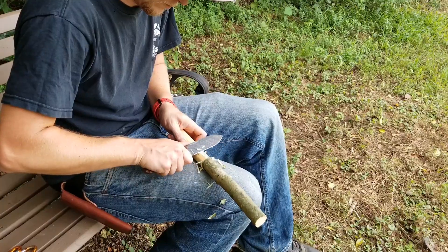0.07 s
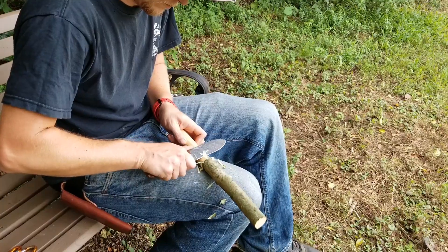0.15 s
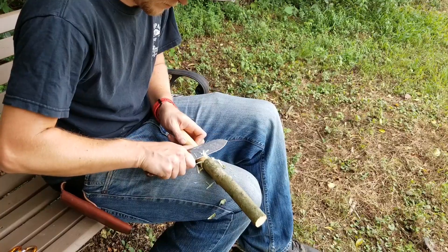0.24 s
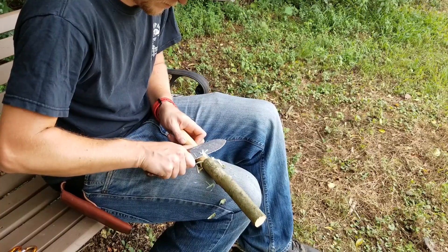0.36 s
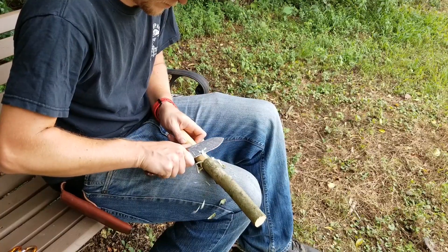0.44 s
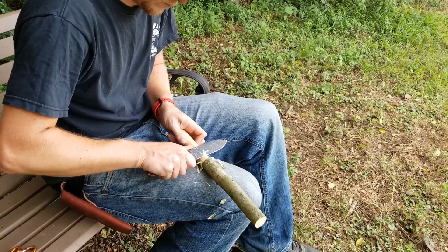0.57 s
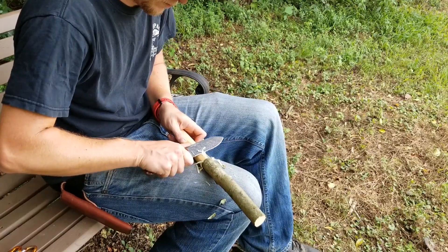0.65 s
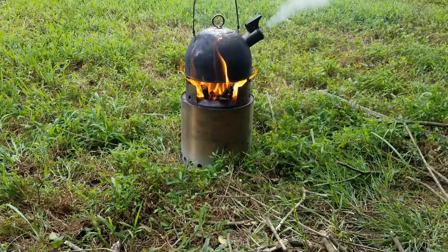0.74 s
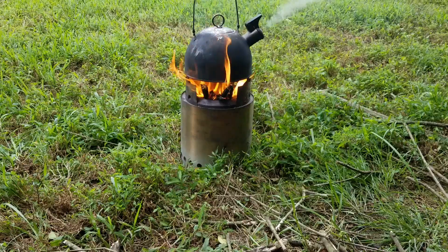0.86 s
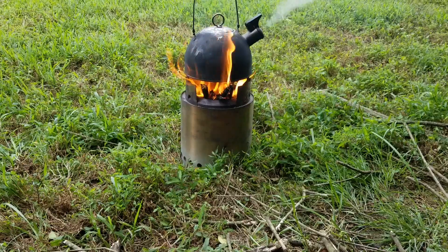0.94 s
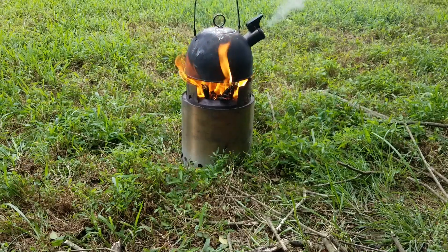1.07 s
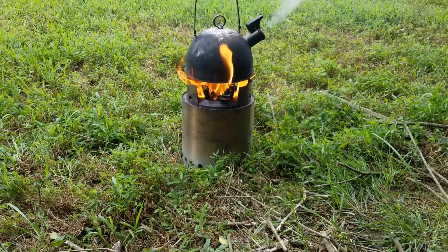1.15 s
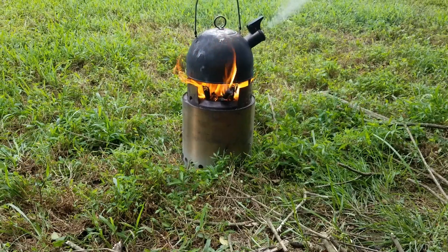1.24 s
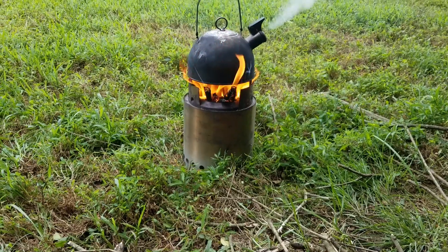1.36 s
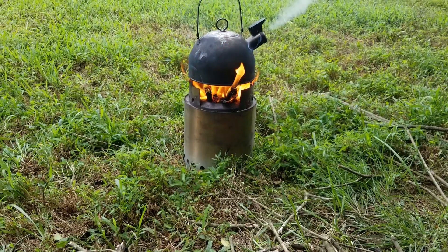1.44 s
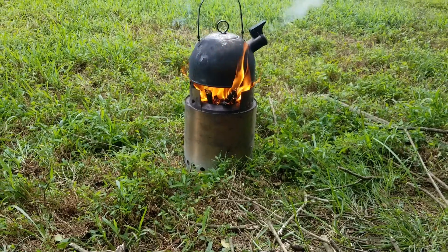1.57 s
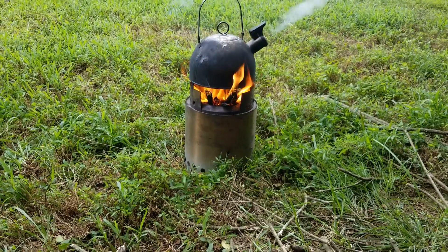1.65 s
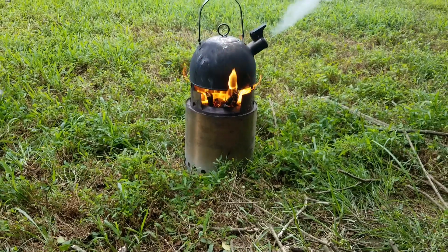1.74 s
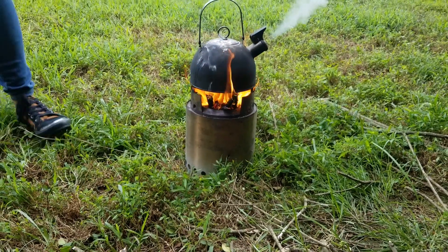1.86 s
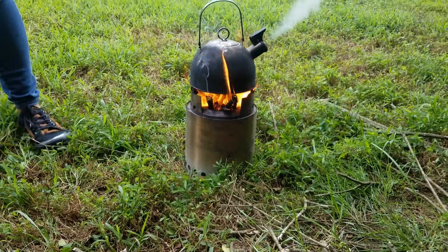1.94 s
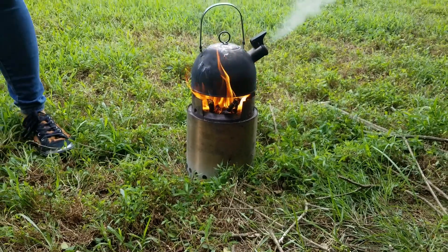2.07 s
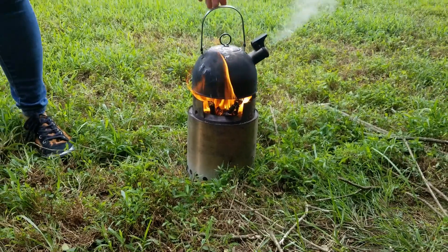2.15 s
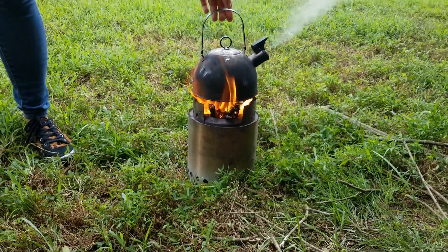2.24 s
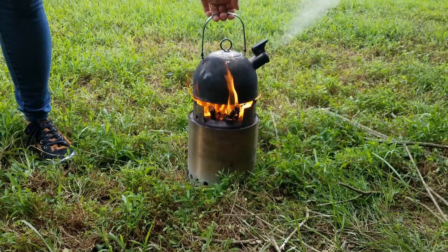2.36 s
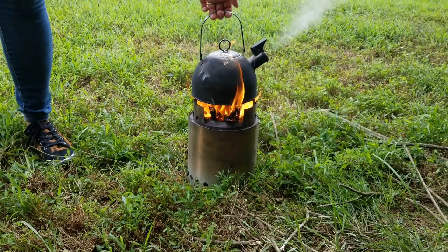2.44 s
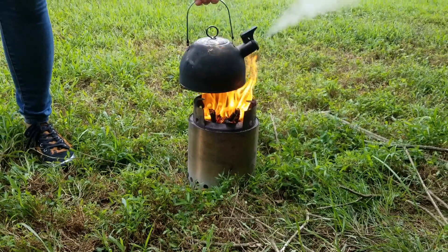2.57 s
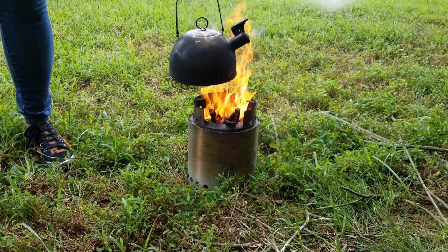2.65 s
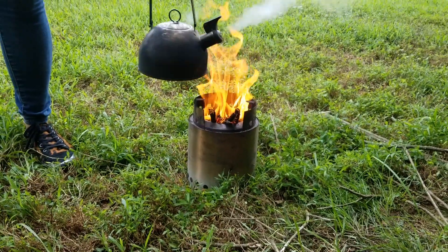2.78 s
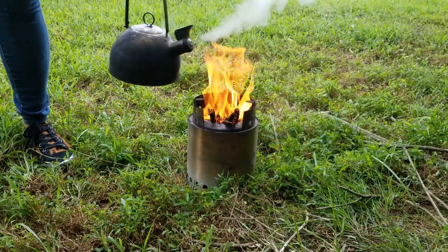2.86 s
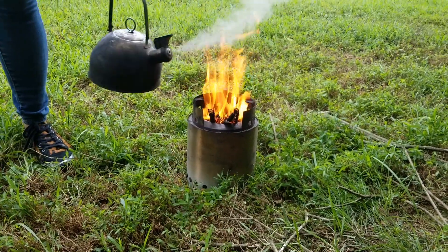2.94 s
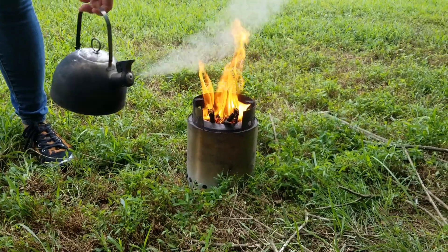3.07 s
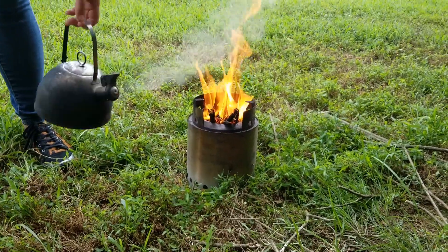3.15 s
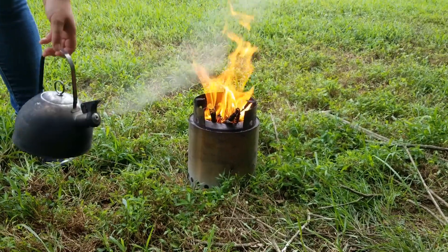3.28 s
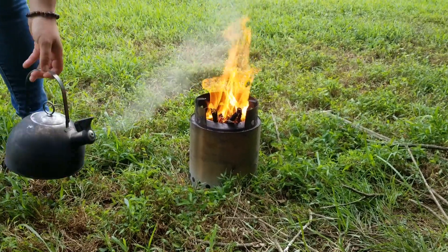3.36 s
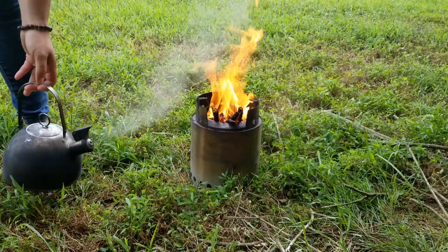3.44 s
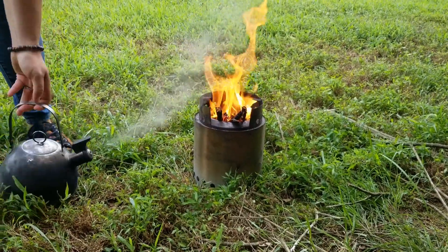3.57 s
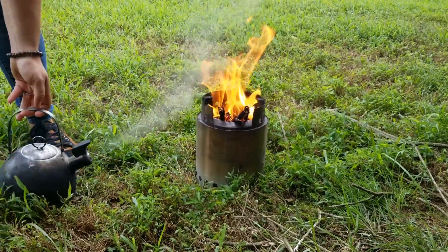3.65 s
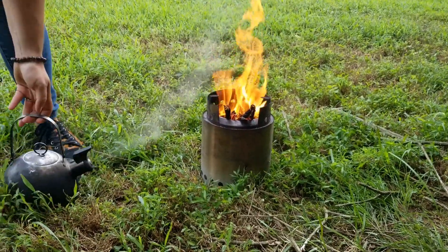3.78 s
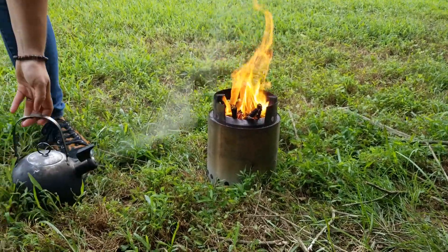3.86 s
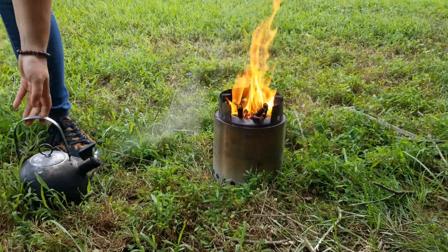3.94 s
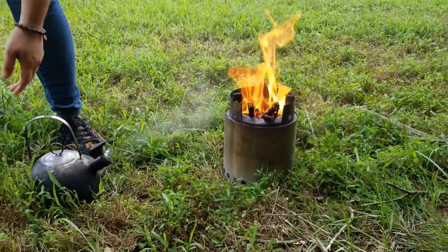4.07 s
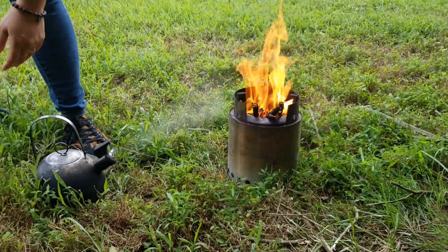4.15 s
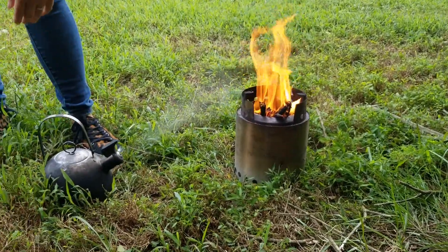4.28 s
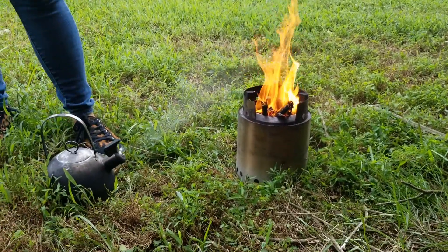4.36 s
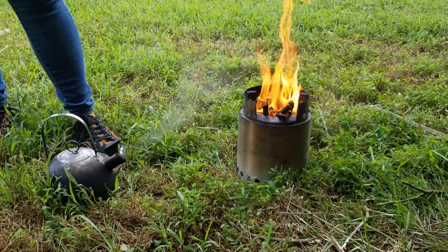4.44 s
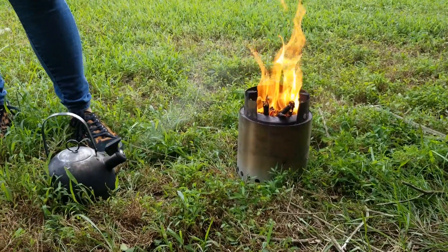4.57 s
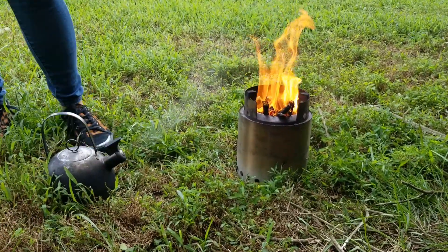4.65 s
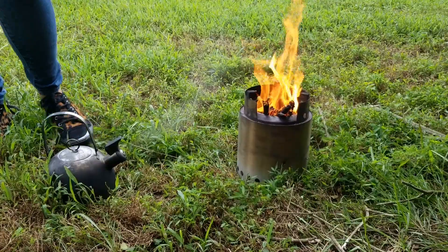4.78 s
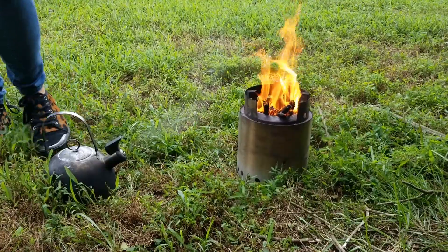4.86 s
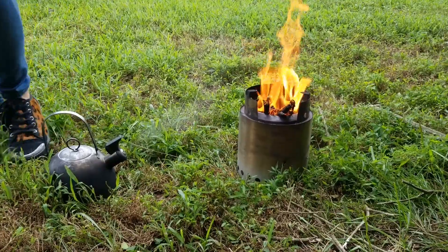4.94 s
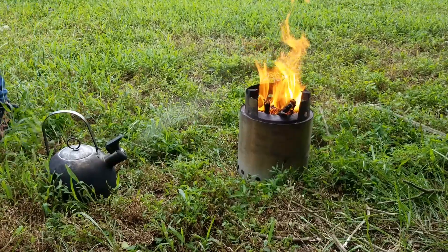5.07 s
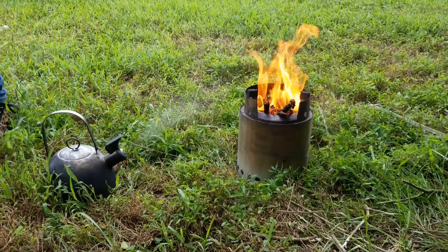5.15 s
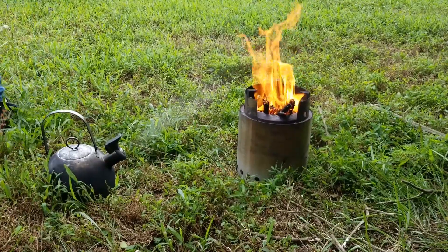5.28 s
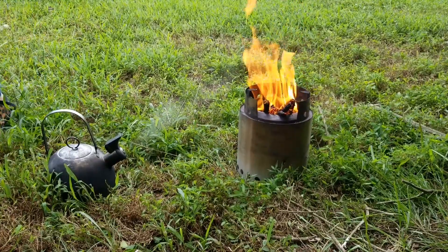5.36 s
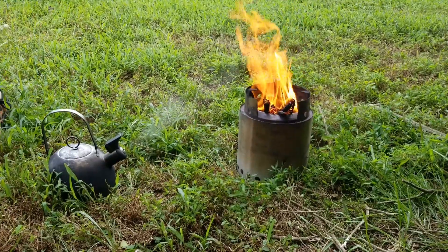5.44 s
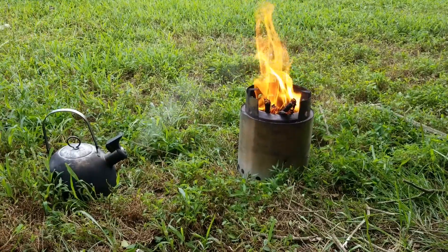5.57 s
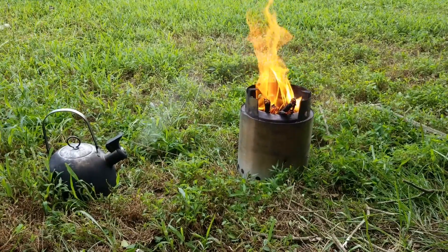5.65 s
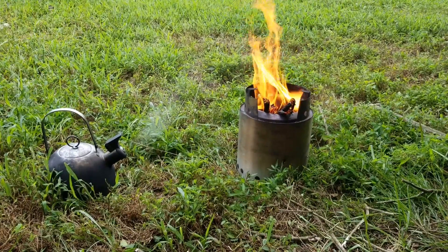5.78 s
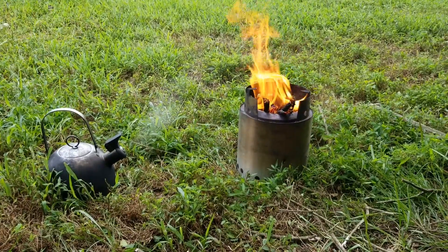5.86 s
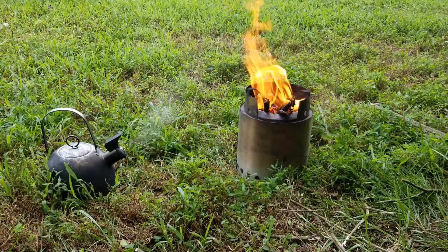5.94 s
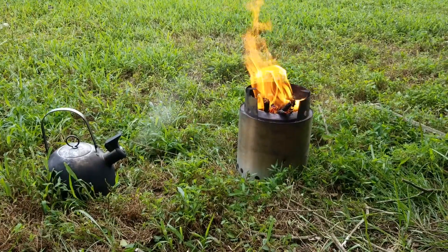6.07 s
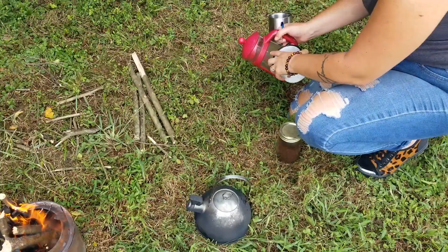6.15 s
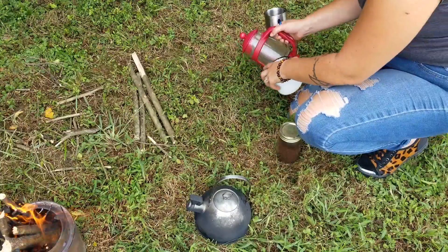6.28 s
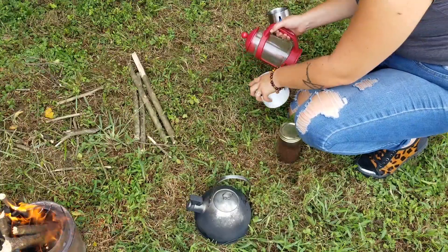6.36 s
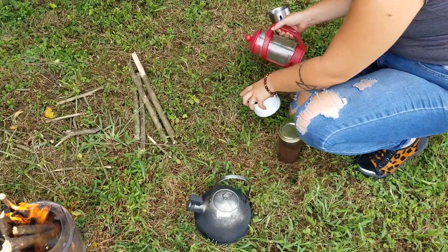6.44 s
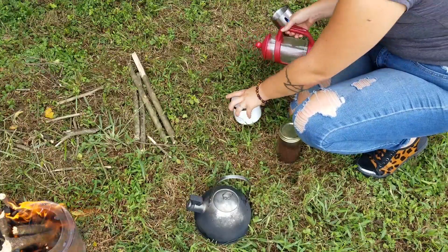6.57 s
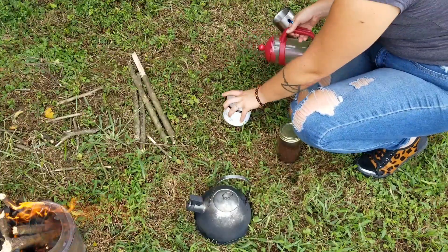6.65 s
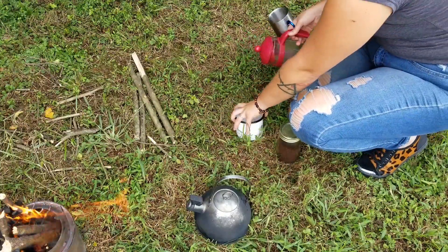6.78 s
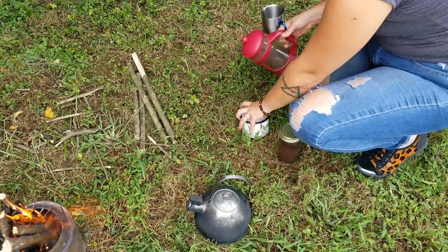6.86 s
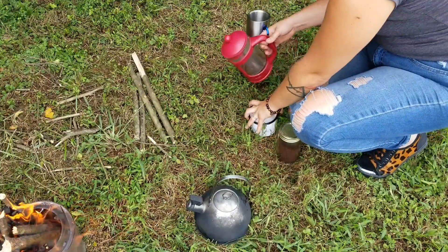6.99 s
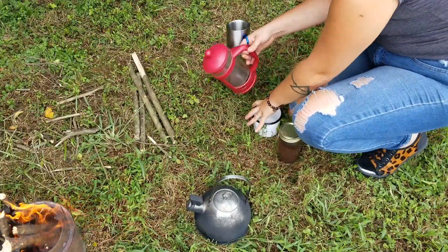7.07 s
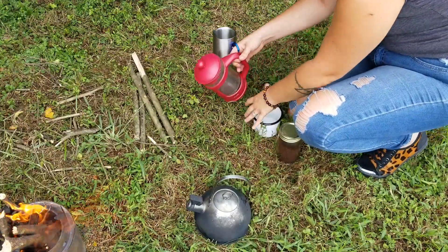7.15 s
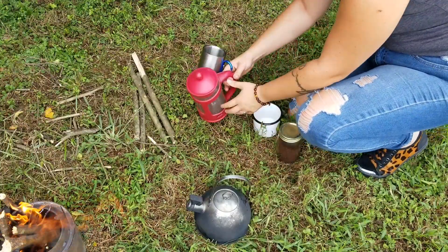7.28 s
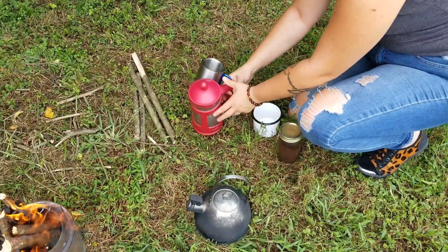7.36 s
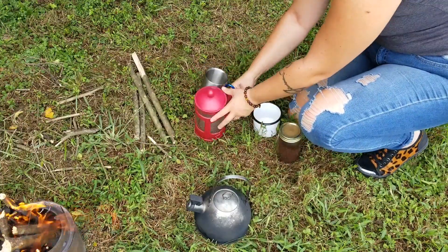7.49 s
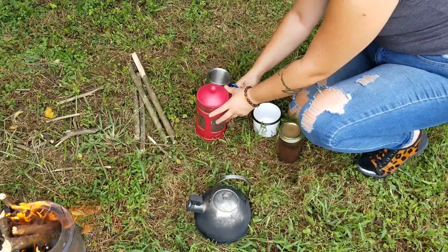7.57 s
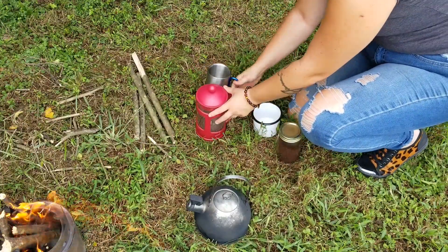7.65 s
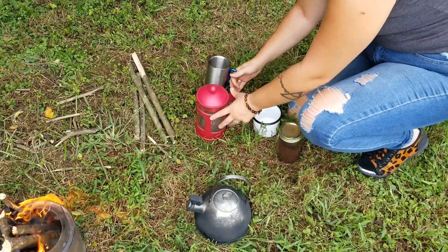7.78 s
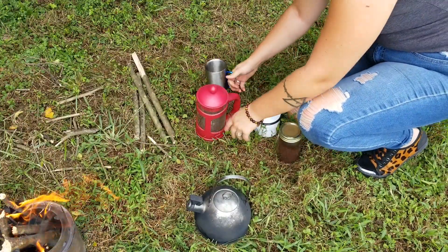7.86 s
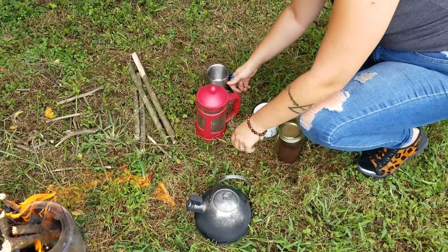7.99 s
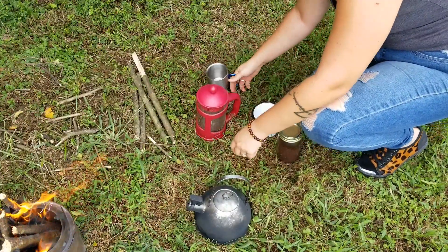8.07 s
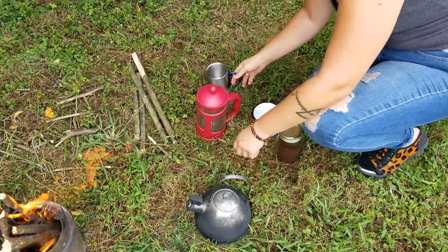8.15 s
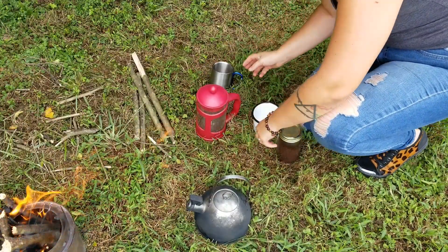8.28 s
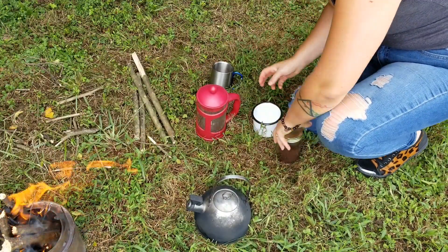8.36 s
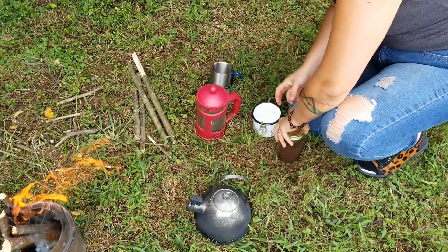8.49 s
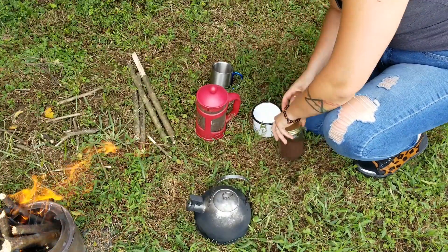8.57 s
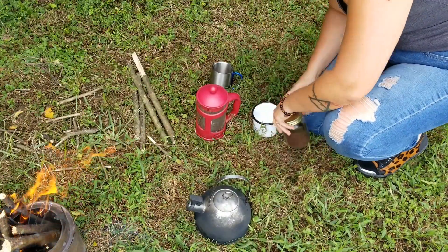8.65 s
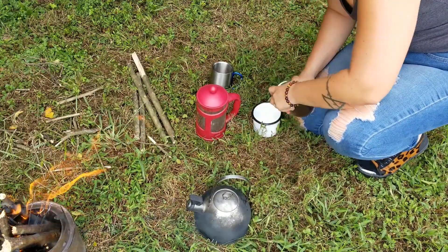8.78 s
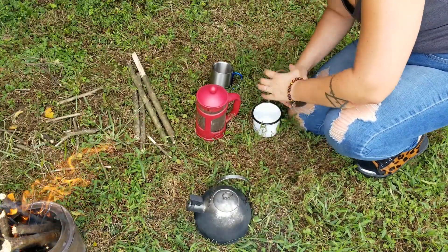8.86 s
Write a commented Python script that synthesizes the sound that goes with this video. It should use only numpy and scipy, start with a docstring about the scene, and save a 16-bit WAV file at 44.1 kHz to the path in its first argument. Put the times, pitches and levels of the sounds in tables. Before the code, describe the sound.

A kettle whistle climbs over hissing steam in a meadow, turns rough, slides down and dies, then a metal mug and coffee pot clink on grass.

```python
"""Whistling kettle in a meadow

A kettle whistles on a wood stove, heard from a breezy bench, the stove and the ground in turn.
Wavering tones wrapped in turbulence jump register, climb, choke at the lift and slide down; noise is the steam.
Then a metal mug and a coffee pot clink, as ringing modes, and are set down on grass that rustles in noise.
Behind them lie banded noise for breeze, fire and insects, a buzzing cricket and a faint hum."""
import sys
import numpy as np
from scipy import signal
from scipy.io import wavfile

SR = 44100
rng = np.random.default_rng(int(sys.argv[2]) if len(sys.argv) > 2 else 0)


def output_pcm(signal):
    """Save a mono or channel-first signal as 16-bit PCM at the path in sys.argv[1].

    Samples are clipped to [-1, 1] before scaling.
    """
    pcm = np.clip(np.atleast_2d(signal).T, -1, 1) * 32767
    wavfile.write(sys.argv[1], SR, np.round(pcm).astype(np.int16))


N = 393354
TIME = np.arange(N) / SR
BENCH, STOVE, GROUND = (-.1, .754), (.766, 6.153), (6.181, 9)   # listening spots: start, end in s


def whistle():
    """Steady pressure gives a clean tone; sloshing makes it rough and splits it; then it sinks with the pressure."""
    steady = early() + squeal() + full_boil()
    rough = catch() + relapse() + shriek()
    return steady + rough + sinking() + split() + dying()


# Kettle heard from the bench: t/s, f/Hz, level/dB
EARLY_PITCH = [(0.0, 2178, -39.5), (.07, 2220, -42.5), (.18, 2134, -38), (.36, 2086, -37.5),
               (.5, 2084, -42.5), (.63, 2074, -41), (.665, 2000, -40), (.755, 1993, -37)]
# Its clear partials: multiple of the pitch, level/dB re the tone
EARLY_PARTIALS = [(1, 0), (2, -13.5), (3, -6), (4, -20.5)]


def early():
    """The low register, rich in overtones."""
    return register(EARLY_PITCH, EARLY_PARTIALS, wobble=.0045, breath_db=-25, flutter_db=1.2)


# Brief high register: t/s, f/Hz, level/dB
SQUEAL_PITCH = [(.768, 5460, -27.5), (.84, 5555, -25.5), (.89, 5650, -25)]
# Partials of the squeal, catch and relapse: multiple of the pitch, level/dB re the tone
SQUEAL_PARTIALS = [(1, 0), (2, -15.5)]


def squeal():
    """The tone jumps to a high, breathy register."""
    return register(SQUEAL_PITCH, SQUEAL_PARTIALS, wobble=.0039, breath_db=-14, fade=.003)


# Main, climbing register: t/s, f/Hz, level/dB
BOIL_PITCH = [(.895, 3508, -28.5), (1.18, 3573, -26), (1.37, 3683, -22), (1.55, 3741, -20.5),
              (1.94, 3757, -19.5), (1.99, 3850, -20.5), (2.18, 3880, -21), (2.32, 3970, -22.5),
              (2.425, 4115, -22.5), (2.495, 4000, -22), (2.605, 4104, -26), (2.655, 3980, -43),
              (2.675, 4040, -33.5)]
# Its clear partials: multiple of the pitch, level/dB re the tone
BOIL_PARTIALS = [(1, 0), (2, -13), (3, -26.5), (4, -45)]
# Breathy edge tones that follow it: multiple of the pitch, level/dB re the tone, width/Hz
BOIL_EDGES = [(.76, -31.5, 250), (.95, -23.5, 120), (1.24, -32, 150), (1.49, -24, 195), (1.75, -30.5, 200),
              (2, -25, 200), (2.37, -28, 200), (2.68, -40, 200), (3.5, -45, 300)]


def full_boil():
    """The main register climbs and grows rougher."""
    return register(BOIL_PITCH, BOIL_PARTIALS, wobble=.004, breath_db=-22, roughening_db=7,
                    skirt_hz=240, edges=BOIL_EDGES, flutter_db=.9)


# Tone catching again after the choke: t/s, f/Hz, level/dB
CATCH_PITCH = [(2.785, 4670, -38.5), (2.828, 3870, -22.5), (2.895, 3720, -25.5)]


def catch():
    """A rough tone catches and slides down."""
    return register(CATCH_PITCH, SQUEAL_PARTIALS, wobble=.013, breath_db=-10.5, fade=.017)


# Momentary drop to the lower register: t/s, f/Hz, level/dB
RELAPSE_PITCH = [(2.934, 3735, -27.5), (2.95, 3875, -22.5)]


def relapse():
    """The lower register speaks for a moment inside the shriek."""
    return register(RELAPSE_PITCH, SQUEAL_PARTIALS, wobble=.011, breath_db=-9)


# Rough high register: t/s, f/Hz, level/dB
SHRIEK_PITCH = [(2.9, 5670, -23), (2.93, 6085, -22.5), (2.96, 5880, -20), (3.14, 5507, -22.5),
                (3.485, 4620, -28.5)]
# Its clear partials: multiple of the pitch, level/dB re the tone
SHRIEK_PARTIALS = [(1, 0), (2, -27)]
# Its breathy edge tones: multiple of the pitch, level/dB re the tone, width/Hz
SHRIEK_EDGES = [(.61, -17.5, 70), (1.39, -24.5, 220), (1.61, -26.5, 250), (2, -26, 295.5)]


def shriek():
    """A wild high register settles as it falls, silent while the lower register relapses."""
    tone = register(SHRIEK_PITCH, SHRIEK_PARTIALS, wobble=.018, settling_db=11, breath_db=-8.5,
                    roughening_db=-7, edges=SHRIEK_EDGES, flutter_db=2.2, skirt_hz=260, sputter_db=8)
    return tone * (1 - gate(RELAPSE_PITCH[0][0], RELAPSE_PITCH[-1][0]))


# Lower register after the shriek: t/s, f/Hz, level/dB
SINKING_PITCH = [(3.485, 2770, -34), (3.58, 2643, -29.5), (3.65, 2640, -29), (3.725, 2520, -34)]
# Its clear partials: multiple of the pitch, level/dB re the tone
SINKING_PARTIALS = [(1, 0), (2, -2.5), (3, -19), (4, -32)]
# Its breathy edge tones: multiple of the pitch, level/dB re the tone, width/Hz
SINKING_EDGES = [(.73, -21, 130), (1.75, -23.5, 150), (2, -15.5, 200), (3, -21, 250), (3.9, -28, 400)]


def sinking():
    """The tone drops and sags, its octave nearly as strong as itself."""
    return register(SINKING_PITCH, SINKING_PARTIALS, wobble=.0048, breath_db=-16.5, edges=SINKING_EDGES)


# Lower tone of the split whistle: t/s, f/Hz, level/dB
LOW_PITCH = [(3.73, 2310, -40.5), (3.91, 2143, -41), (4.0, 1934, -42), (4.125, 1907, -38.5),
             (4.22, 1950, -56)]
# Its clear partials: multiple of the pitch, level/dB re the tone
LOW_PARTIALS = [(1, 0), (2, -14)]
# Its breathy edge tones: multiple of the pitch, level/dB re the tone, width/Hz
LOW_EDGES = [(.3, -20, 151.2), (1.42, -17.5, 180), (2, -27, 70), (2.52, -17, 220)]
# Upper tone: t/s, f/Hz, level/dB before its partials
TOP_PITCH = [(3.73, 6330, -41.5), (3.9, 5810, -44), (4.01, 5220, -44.5), (4.12, 5000, -46)]
# Its clear partials: multiple of the pitch, level/dB re that level
TOP_PARTIALS = [(1, -0.5), (.632, -3), (.283, -18)]
# Its breathy edge tones: multiple of the pitch, level/dB re that level, width/Hz
TOP_EDGES = [(.53, -10.5, 160), (.65, -10, 180), (.76, -11.5, 70), (.9, -10, 200)]


def split():
    """The whistle splits into a low and a breathy high tone at once."""
    low = register(LOW_PITCH, LOW_PARTIALS, wobble=.0064, breath_db=-14, edges=LOW_EDGES, skirt_hz=120)
    top = register(TOP_PITCH, TOP_PARTIALS, wobble=.0064, breath_db=-5, skirt_hz=220, edges=TOP_EDGES)
    return low + top


# Last slide: t/s, f/Hz, level/dB before the partials and spout resonances
DYING_PITCH = [(4.135, 1530, -42.5), (4.26, 1434, -37.5), (4.41, 1257, -43.5), (4.54, 1206, -45),
               (4.65, 1086, -48.5), (4.77, 943, -50), (4.95, 896, -51.5), (4.99, 843, -53),
               (5.27, 660, -55.5), (5.48, 643, -60.5), (5.54, 586, -55.5), (5.68, 515, -58.5),
               (5.86, 517, -59), (6.15, 397, -61.5)]
# Its partials: multiple of the pitch, level/dB re that level, lowest and highest pitch where each speaks f/Hz
DYING_PARTIALS = [(1, -.5, 490, 1150), (2, -1, 400, 1600), (3, -8, 910, 1100), (4, -1.5, 1255, 1600)]


def dying():
    """The last tone slides down with the pressure; its partials stall one by one."""
    return register(DYING_PITCH, DYING_PARTIALS, failing=True, wobble=.005, breath_db=-15,
                    flutter_db=2.5, skirt_hz=90)


# Spout resonances under the weak last partials: f/Hz, gain/dB
PIPE = [(400, -6), (580, -3), (640, -11.5), (680, -0.5), (930, -0.5), (1040, -2.5), (1200, -4.5),
        (1400, -11), (1600, -13), (1780, -16.5), (2020, -1), (2270, -13), (2480, -10.5), (2850, 4),
        (3700, -17), (4400, -25), (4800, -17), (5050, -8), (5900, -10)]
STALL_DB_PER_OCTAVE = 72   # how fast a partial fades outside its range


def fading_db(partial, pitch):
    """At low pressure a partial depends on the spout's resonances and stalls outside its range."""
    multiple, _, lowest_hz, highest_hz = partial
    outside = np.abs(np.log2(pitch / np.clip(pitch, lowest_hz, highest_hz)))   # octaves
    return at_hz(PIPE, multiple * pitch) - STALL_DB_PER_OCTAVE * outside


def register(rows, partials, wobble, breath_db, edges=(), failing=False, fade=.008, flutter_db=.66,
             overtone_flutter_db=2.0, skirt_hz=170, sputter_db=3.5, roughening_db=0, settling_db=0):
    """One register of the whistle: a wavering tone with its partials, wrapped in turbulence."""
    opening = gate(rows[0][0] - fade / 2, rows[-1][0] + fade / 2, fade)
    on = opening > 0
    size = int(on.sum())
    pitch, level_db = in_time(rows, TIME[on])
    progress = np.linspace(0, 1, size)
    waver = wobble * from_db(-settling_db * progress) * (drift(22, size) + .77 * drift(110, size))
    phase = 2 * np.pi * np.cumsum(pitch * (1 + waver)) / SR
    breathiness = from_db(breath_db + roughening_db * progress)
    tone = 0
    for partial in partials:   # overtones are breathier and less steady
        multiple, db = partial[:2]
        db = db + (flutter_db if multiple == 1 else overtone_flutter_db) * drift(35, size)
        if failing:
            db = db + fading_db(partial, pitch)
        clear = np.sqrt(2) * np.sin(multiple * phase)
        skirt = breathiness * np.sqrt(multiple) * breath(multiple * phase, skirt_hz)
        tone = tone + from_db(db) * (clear + skirt)
    # the edge tones burst out together
    sputter = rms_one(from_db(sputter_db * np.tanh(2 * drift(28, size))))
    for multiple, db, width in edges:
        tone = tone + from_db(db) * sputter * breath(multiple * phase, width)
    out = np.zeros(N)
    out[on] = tone * from_db(level_db)
    return out * opening


# Wet blur around the dying whistle: multiple of its pitch, level/dB re the spurt, width/Hz
GURGLE = [(1, -6, 70), (1.848, -5, 120), (2.1, -1, 109.5), (2.8, -8, 130), (4, -11.5, 199), (5, -18, 150)]
# Spurts of wet steam: t/s of the peak, level/dB before the blur, s to rise 20 dB, s to fall 20 dB
SPURTS = [(4.2, -55.5, .6, .9), (4.6, -55.5, .15, .15), (4.94, -71, .1, 0.058)]


def gurgle():
    """Wet steam blurs the last overtones in spurts as the whistle fails."""
    phase = 2 * np.pi * np.cumsum(in_time(DYING_PITCH)[0]) / SR
    blur = sum(from_db(db) * breath(multiple * phase, width) for multiple, db, width in GURGLE)
    flicker = from_db(2.5 * drift(40))
    return blur * swells(SPURTS) * flicker * gate(DYING_PITCH[0][0], STOVE[1], edge=.05)


# Steam jet: t/s, level/dB per Hz before the spout's colour, f/Hz above which its hiss dulls
JET = [(.79, -72.5, 3650), (1.15, -70, 3730), (1.65, -79, 5100), (2.58, -74, 4960), (2.72, -79, 4120),
       (2.82, -70, 4260), (3.1, -75.5, 4000), (3.45, -76, 3800), (3.69, -87.5, 5400), (3.76, -77, 3400),
       (4.15, -77, 2800), (4.299, -92, 3000), (4.6, -91, 3200), (4.9, -120, 3400)]
# Colour of the spout: f/Hz, gain/dB
SPOUT = [(150, -45), (300, -25), (500, -36), (800, -34), (1300, -22.5), (2000, -18.5), (2800, -6),
         (4100, -8.5), (4500, -10.5), (4800, -5.5), (5400, 1.5), (7500, 2.5), (9200, 2.5), (12000, 2.5),
         (15500, 2)]
JET_DULLING_DB = 10.5   # loss one octave above that point; it grows with the square of the octaves


def steam():
    """The jet hisses through the spout and dulls as the pressure falls."""
    level_db, corner_hz = in_time(JET)
    corner = np.log2(corner_hz)

    def level_at(hz):
        dulling_db = JET_DULLING_DB * np.maximum(np.log2(hz) - corner, 0) ** 2
        return level_db + at_hz(SPOUT, hz) - dulling_db
    return banded_noise(level_at, patchy_db=2.0, span=(STOVE[0], JET[-1][0]))


# Simmer before the lift: f/Hz, level/dB per Hz
SEETHE = [(40, -80), (80, -73), (200, -88), (400, -98), (700, -101), (1250, -90), (1750, -88.5),
          (2100, -97), (3000, -106)]
LIFT_S, SEETHE_FALL_DB_PER_S = 2.75, 12


def seethe():
    """Bubbles simmer in the kettle and settle once it is off the fire."""
    simmer = banded_noise(lambda hz: at_hz(SEETHE, hz), patchy_db=1.5, span=(STOVE[0], JET[-1][0]))
    return simmer * from_db(-SEETHE_FALL_DB_PER_S * np.maximum(TIME - LIFT_S, 0))


# Water moving as the kettle swings off: t/s of the peak, level/dB, s to rise 20 dB, s to fall 20 dB
SLOSHES = [(2.55, -57, .1, .09), (2.71, -48, .08, 0.27), (3.15, -60, .5, .45)]
# Colour of a slosh: f/Hz, relative level/dB per Hz
SLOSH = [(100, -7), (240, 1), (420, -11.5), (600, -7.5), (800, -1), (1100, 3), (1500, -21.5), (2500, -10),
         (8000, -30.5)]


def slosh():
    """Water washes up the hot wall and churns."""
    return stirred(SLOSHES, SLOSH, patchy_db=2.5, grain_db=1.0, until=DYING_PITCH[0][0])


# Modes of the pot: f/Hz before tuning, level/dB re the blow, t60/s, side of the wall where strong (signed)
POT = [(685, -4.5, 0.042, -0.22), (858, -3, 0.22, -0.93), (904, -0.5, 0.13, -0.082), (961, -2.5, .11, 1),
       (1434, -1.5, 0.11, -0.37), (1560, -29, 0.09, 0), (1806, -18, 0.12, 0.095), (1916, -9.5, 0.035, 0.36),
       (2200, -24, 0.22, -0.79), (2500, -21.5, 0.059, 0.49), (2650, -25, 0.1, 0.5),
       (2700, -44, 0.84, -0.82), (2870, -33, 0.36, -0.14), (3710, -30, 0.16, 0.63), (3720, -32, .1, 0.78),
       (3860, -32, .11, 0.093), (4090, -35, 0.29, -0.31), (4300, -30, 0.18, -0.2), (4370, -33, 0.19, 0.3),
       (5669, -40, 0.25, 0.3), (5814, -39, 0.26, -0.34), (5920, -31, 0.15, -0.086), (8400, -32, .08, -0.11),
       (9960, -31, 0.036, 0.93)]
# Blows on the pot: t/s, level/dB, contact cut-off f/Hz, side struck/dB, tuning factor
POT_BLOWS = [(6.3125, -21.5, 7000, -2.5, 0.98), (7.018, -48.5, 13900, 9, 0.97),
             (7.085, -52, 14000, 12, 1.02), (7.26, -11, 12100, 5, 1.001), (7.472, -22.5, 7000, -6.5, 1.013),
             (7.543, -34.5, 9000, -5.5, 1.0)]


def pot():
    """The coffee pot's wall rings in its modes at each blow."""
    return struck(POT, POT_BLOWS)


def clatter(level_db=-26.0, fall_db=-6, count=130):
    """Each blow also wakes a crowd of weak, short modes in the pot's lid, frame and plunger."""
    out, t = np.zeros(N), TIME[:SR // 3]
    hz = np.geomspace(1100, 6500, count)[:, None] * rng.uniform(.98, 1.02, (count, 1))
    for s, db, *_ in POT_BLOWS:
        strength = rng.uniform(-1, 1, (count, 1))
        t60 = rng.uniform(.07, .19, (count, 1))
        mode_db = db + level_db + fall_db * np.log2(hz / hz[0]) - 60 * t / t60   # fall_db per octave
        add(out, s, np.sum(strength * from_db(mode_db) * np.sin(2 * np.pi * hz * t), axis=0))
    return out


# Modes of the mug: f/Hz before tuning, level/dB re the blow, t60/s, side of the wall where strong (signed)
MUG = [(726, -1, 0.035, -0.5), (900, 0.5, 0.014, 0), (1261, -8, 0.46, 0.4), (2537, -34, .24, 1.44),
       (4080, -47, 0.083, 2.5), (6000, -54, 0.13, 2)]
# Blows on the mug: t/s, level/dB, contact cut-off f/Hz, side struck/dB, tuning factor
MUG_BLOWS = [(6.2307, -17.5, 6000, 0, 0.98)]


def mug():
    """The metal mug rings in a few modes when struck."""
    return struck(MUG, MUG_BLOWS)


# Rim of the mug along the pot: t/s of the peak, level/dB, s to rise 20 dB, s to fall 20 dB
RUBS = [(6.83, -52, 0.053, 0.033), (7.02, -68, .08, .12), (7.08, -66, .06, 0.074)]
RUB_SIDE_DB = 26.5   # the side of the mug that rubbing excites


def rub():
    """Friction feeds the mug's modes with a steady stream of tiny slips."""
    ring = struck(MUG, [(0, 0, 9800, RUB_SIDE_DB, 1.0)])[:SR // 4]
    slips = rng.standard_normal(N) * swells(RUBS)
    return signal.fftconvolve(slips, ring / np.linalg.norm(ring))[:N]


def struck(modes, blows):
    """Each blow rings the wall's modes; where it lands decides which of them are strong."""
    out, t = np.zeros(N), TIME[:SR]
    for s, db, contact_hz, side_db, tuning in blows:
        ring = np.zeros(len(t))
        for k, (hz, mode_db, t60, side) in enumerate(modes):
            decay = from_db(db + mode_db + side * side_db - 60 * t / t60)
            ring += (-1) ** k * decay * np.sin(2 * np.pi * hz * tuning * t)
        add(out, s, filtered(ring, contact_hz, "low", order=1))   # a soft contact dulls the ring
    return out


# Dry knocks, thuds and twig snaps: t/s, level/dB, lowest f/Hz, highest f/Hz, t60/s
KNOCKS = [(4.654, -40.5, 500, 5000, 0.012), (6.3105, -32, 397, 2750, 0.019),
          (6.459, -48.5, 805, 7030, 0.028), (6.53, -54, 600, 2520, 0.022),
          (7.2604, -18.5, 500, 4500, 0.0088), (7.261, -33.5, 216, 510, 0.12),
          (7.279, -28.5, 905, 4370, 0.027), (7.5418, -23.5, 496, 3100, 0.016), (7.542, -30, 90, 1200, 0.13),
          (7.574, -29, 200, 4100, 0.017), (7.8448, -39.5, 900, 4500, 0.014),
          (7.856, -44.5, 1100, 2240, 0.1), (8.013, -43.5, 1000, 1800, 0.045),
          (8.066, -48.5, 1200, 5000, 0.047), (8.2238, -45.5, 600, 2200, 0.012),
          (8.3515, -58, 2000, 9000, .012)]


def knocks():
    """Contacts that die at once: short cracks of noise."""
    out, t = np.zeros(N), TIME[:SR // 4]
    for s, db, low_hz, high_hz, t60 in KNOCKS:
        crack = rms_one(filtered(rng.standard_normal(len(t)), [low_hz, high_hz], "band"))
        add(out, s, crack * from_db(db - 60 * t / t60))
    return out


# Feet and hands in the grass: t/s of the peak, level/dB, s to rise 20 dB, s to fall 20 dB
RUSTLES = [(5.55, -69, .12, .3), (5.85, -60.5, 0.8, 0.5), (6.12, -62, 1, 0.1), (6.41, -51.5, 0.55, 0.68),
           (7.9, -65, .12, .3), (8.07, -52, 0.3, 0.35)]
# Colour of rustling grass and clothes: f/Hz, relative level/dB per Hz
RUSTLE = [(100, 9.5), (400, 5), (1400, 2), (2600, -11), (4800, -14), (8000, -14), (15000, -25)]
# Shoes passing: t/s of the peak, level/dB, s to rise 20 dB, s to fall 20 dB
SWISHES = [(5.54, -64, .05, .13), (5.81, -68, .1, .1), (5.96, -59, 0.037, .5), (6.12, -60.5, .3, .5)]
# Colour of a swish: f/Hz, relative level/dB per Hz
SWISH = [(300, -1.5), (1200, -7), (2500, -13.5), (4000, 2), (6000, 9), (9000, 5), (15000, 1)]


def rustle():
    """Blades of grass crackle unevenly under moving feet and hands; shoes swish past."""
    grass = stirred(RUSTLES, RUSTLE, patchy_db=3.0, grain_db=2.5, until=GROUND[1])
    shoes = stirred(SWISHES, SWISH, patchy_db=4.5, grain_db=.5, until=STOVE[1])
    return grass + shoes


def bump(s=6.118, width=.031, level_db=-33):
    """A soft, deep bump: low noise in a short, rounded swell."""
    rumble = filtered(rng.standard_normal(N), [40, 85], "band") * np.exp(-.5 * ((TIME - s) / width) ** 2)
    return from_db(level_db) * np.sqrt(2) * rumble / np.abs(rumble).max()


# Air at the bench: f/Hz, level/dB per Hz
BENCH_AIR = [(25, -62), (50, -58), (105, -55), (150, -71.5), (215, -65), (280, -80), (600, -88.5),
             (1700, -86.5), (3000, -100), (5000, -92), (8000, -90), (10000, -97), (15500, -95.5)]
# Air at the stove, insect chorus near 7 kHz: f/Hz, level/dB per Hz
STOVE_AIR = [(25, -85), (55, -73.5), (90, -73), (160, -84.5), (300, -92), (600, -99.5), (1200, -97.5),
             (2000, -109), (3600, -116), (5500, -110), (6400, -104), (7200, -94), (9000, -103),
             (11000, -108), (15500, -110)]
# Air near the ground, insect chorus near 7 kHz: f/Hz, level/dB per Hz
GROUND_AIR = [(25, -83), (90, -73), (160, -83), (300, -92.5), (600, -96.5), (1150, -88), (1750, -90),
              (2300, -113), (3000, -121), (4200, -122), (5300, -115), (6300, -108), (7100, -92.5),
              (9500, -101), (14000, -99), (15500, -103)]


def meadow():
    """Breeze, fire and insects as heard from each spot; cricket and hum only from the ground."""
    bench = banded_noise(lambda hz: at_hz(BENCH_AIR, hz), patchy_db=2.5, span=BENCH)
    stove = banded_noise(lambda hz: at_hz(STOVE_AIR, hz), patchy_db=.27, span=STOVE)
    ground = banded_noise(lambda hz: at_hz(GROUND_AIR, hz), patchy_db=-.5, span=GROUND)
    return bench + stove + ground + (trill() + hum()) * gate(*GROUND)


def trill(centre_hz=10550, strokes_hz=44, level_db=-72):
    """A bush cricket buzzes its wings, high and thin: each stroke swells a narrow rasp."""
    rasp = rms_one(filtered(rng.standard_normal(N), [centre_hz - 180, centre_hz + 180], "band"))
    return from_db(level_db) * rasp * (1 + np.sin(2 * np.pi * strokes_hz * TIME))


# Faint far hum coming and going: t/s of the peak, level/dB, s to rise 20 dB, s to fall 20 dB
HUM_SWELLS = [(6.3, -55, 1.5, 1.07), (8.92, -55, .4, .4)]


def hum(hz=342):
    """A narrow, wavering drone from far away."""
    return swells(HUM_SWELLS) * breath(2 * np.pi * hz * TIME, width=7.6)


def stirred(movements, colour, patchy_db, grain_db, until):
    """Uneven, grainy noise of one colour that swells with each movement."""
    first_s, _, rise, _ = movements[0]
    noise = banded_noise(lambda hz: at_hz(colour, hz), patchy_db, span=(first_s - 2 * rise, until))
    grain = from_db(grain_db * drift(88))
    return swells(movements) * grain * noise / np.std(noise[noise != 0])


def swells(rows):
    """Gain of a run of movements, each rising to its peak and falling away."""
    power = 0
    for s, db, rise, fall in rows:
        below_peak_db = 20 * np.maximum((s - TIME) / rise, (TIME - s) / fall)
        power = power + from_db(db - below_peak_db) ** 2
    return np.sqrt(power)


def banded_noise(level_at, patchy_db, span):
    """Narrow bands of noise within a span, each flickering on its own; level_at(Hz) gives dB per Hz."""
    opening = gate(*span)
    on = opening > 0
    size, out = int(on.sum()), np.zeros(N)
    edges = np.geomspace(170, 16150, 46) - 150   # 20 Hz to 16 kHz
    white = rng.standard_normal((2, size)) * np.sqrt(SR / 2)   # unit power per Hz
    for k, (low, high) in enumerate(zip(edges, edges[1:])):
        band = filtered(white[k % 2], [low, high], "band", order=3)   # neighbours use separate noises
        level_db = np.broadcast_to(level_at(np.sqrt(low * high)), N)[on]
        out[on] += band * from_db(level_db + patchy_db * drift(17, size))
    return out * opening


def breath(phase, width):
    """A narrow band of turbulence riding on a moving pitch."""
    return drift(width, len(phase)) * np.sin(phase) + drift(width, len(phase)) * np.cos(phase)


def drift(rate, size=N):
    """Smooth chance of spread 1, changing up to about `rate` times a second."""
    step, run_in = 8, 2000   # drawn every 8 samples, after the filter has settled
    low_pass = signal.butter(2, rate, fs=SR / step, output="sos")
    slow = signal.sosfilt(low_pass, rng.standard_normal(size // step + run_in + 2))[run_in:]
    return np.interp(np.arange(size) / step, np.arange(len(slow)), rms_one(slow))


def gate(start, end, edge=.004, t=TIME):
    """One between two times, with short ramps."""
    return np.clip(np.minimum(t - start, end - t) / edge + .5, 0, 1)


def filtered(x, hz, kind, order=2):
    """Butterworth filter."""
    return signal.sosfilt(signal.butter(order, np.clip(hz, 10, .45 * SR), kind, fs=SR, output="sos"), x)


def in_time(rows, t=TIME):
    """The columns of a curve at times t."""
    s, *columns = np.transpose(rows)
    return [np.interp(t, s, column) for column in columns]


def at_hz(points, hz):
    """A colour curve read at a frequency, on a log scale."""
    curve = np.array(points)
    return np.interp(np.log(hz), np.log(curve[:, 0]), curve[:, 1])


def from_db(db):
    """Decibels to gain."""
    return 10 ** (np.asarray(db) / 20)


def rms_one(x):
    """Scale to an RMS of one."""
    return x / np.sqrt(np.mean(np.abs(x) ** 2) + 1e-20)


def add(out, s, sound):
    """Mix a sound in at time s, cut at the end."""
    start = int(s * SR)
    out[start:start + len(sound)] += sound[:N - start]


def scene():
    """Kettle, dishes and meadow, with a moment of silence between the spots."""
    kettle = whistle() + gurgle() + steam() + seethe() + slosh()
    dishes = pot() + clatter() + mug() + rub() + knocks()
    sound = kettle + dishes + rustle() + bump() + meadow()
    return (sound * (gate(*BENCH) + gate(*STOVE) + gate(*GROUND)))[None]


CUTOFF_HZ = 15600


def record(dry):
    """A steep elliptic low-pass cuts the top."""
    return signal.sosfilt(signal.ellip(10, .1, 80, CUTOFF_HZ, fs=SR, output="sos"), dry)


dry = scene()
out = record(dry)
output_pcm(out)
```